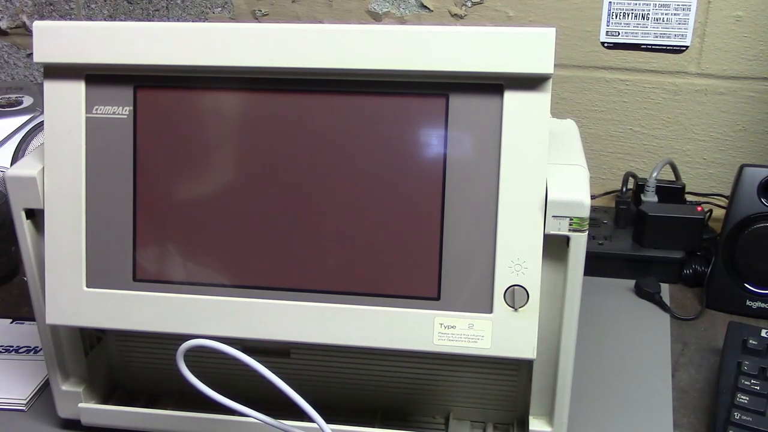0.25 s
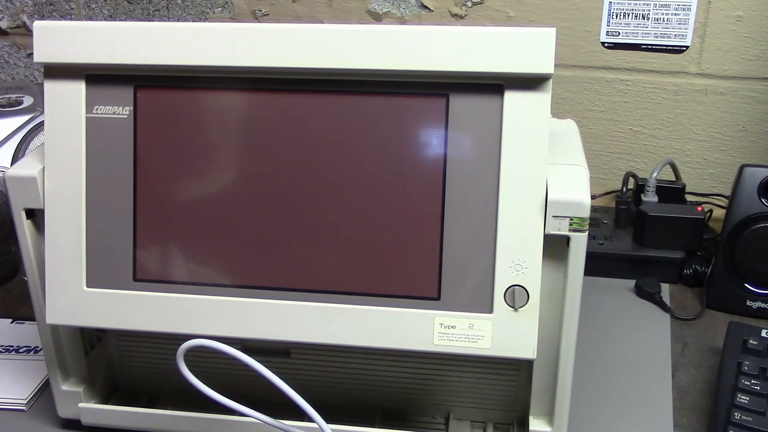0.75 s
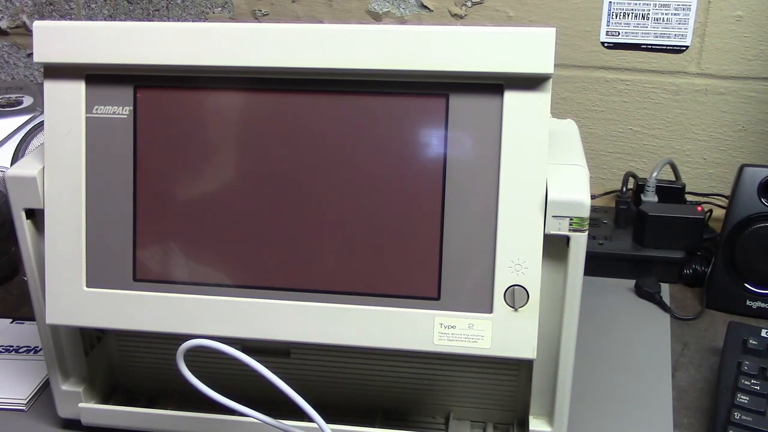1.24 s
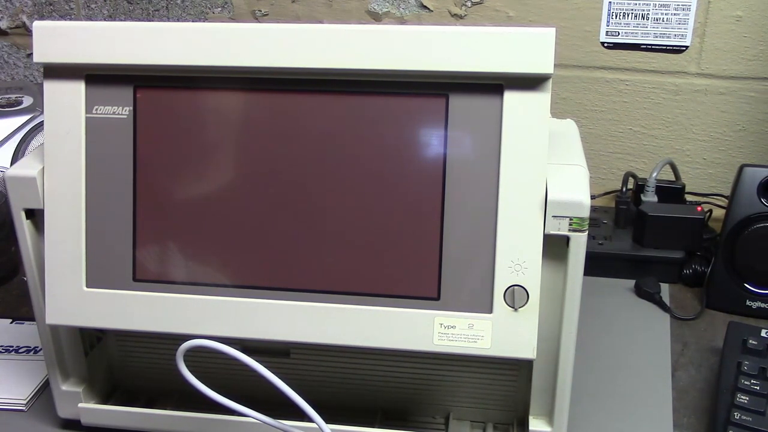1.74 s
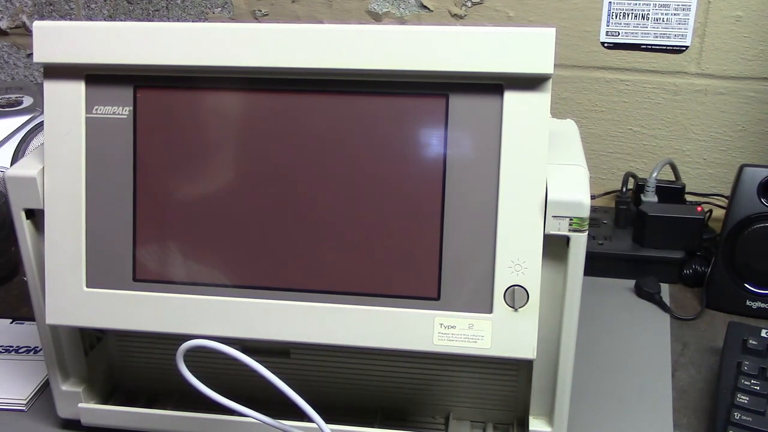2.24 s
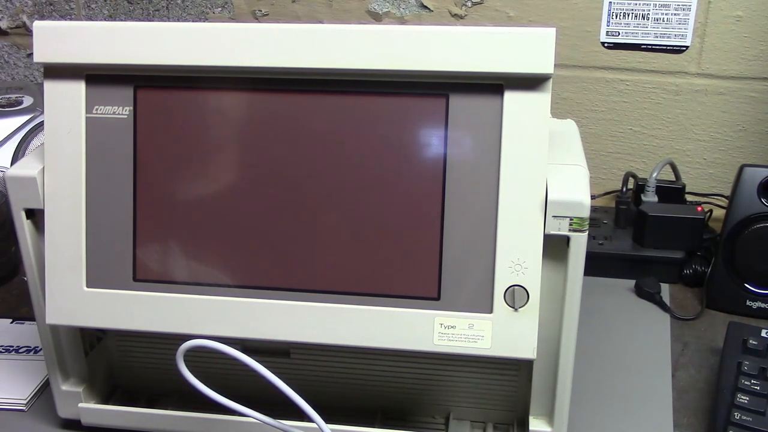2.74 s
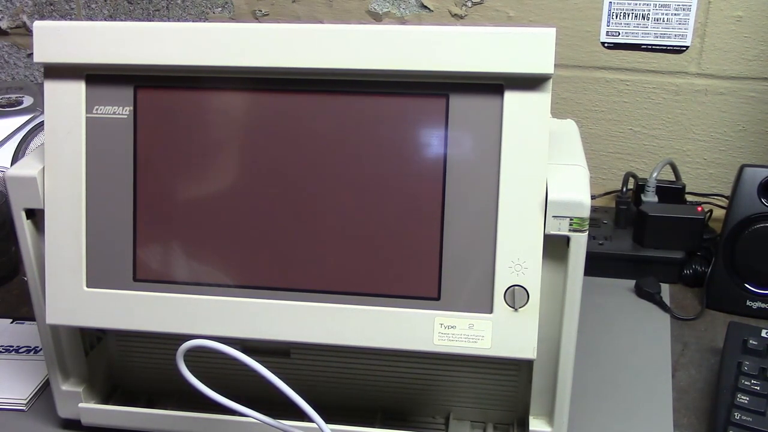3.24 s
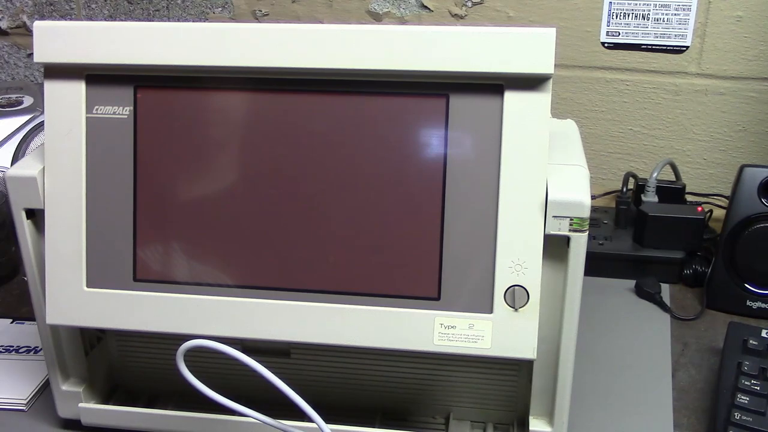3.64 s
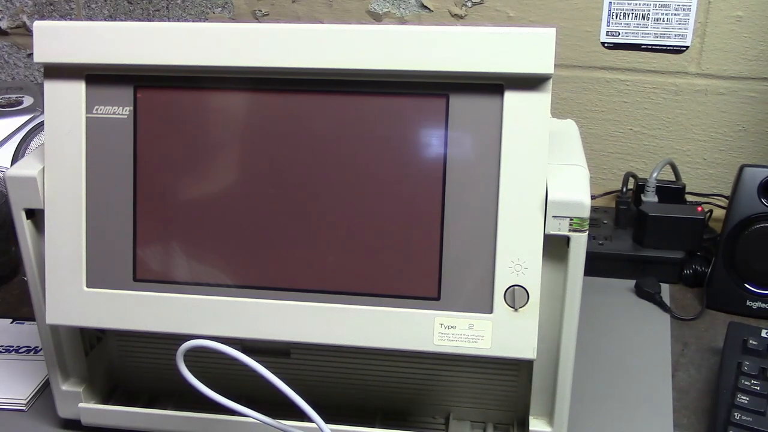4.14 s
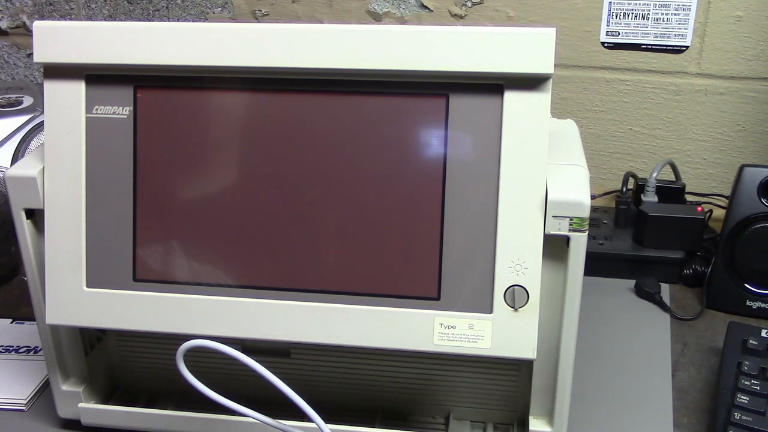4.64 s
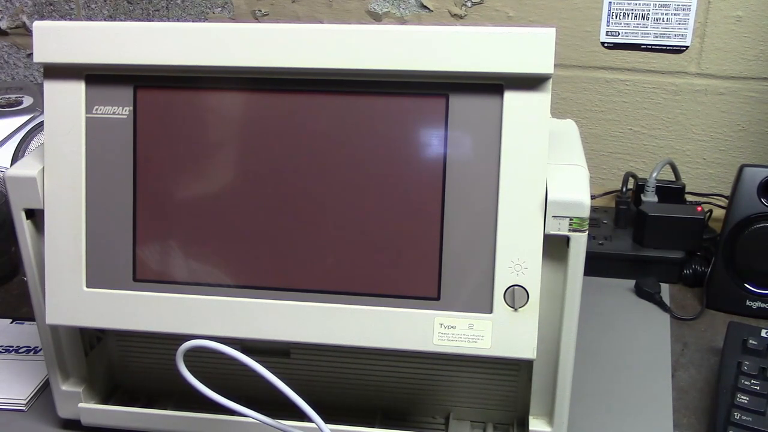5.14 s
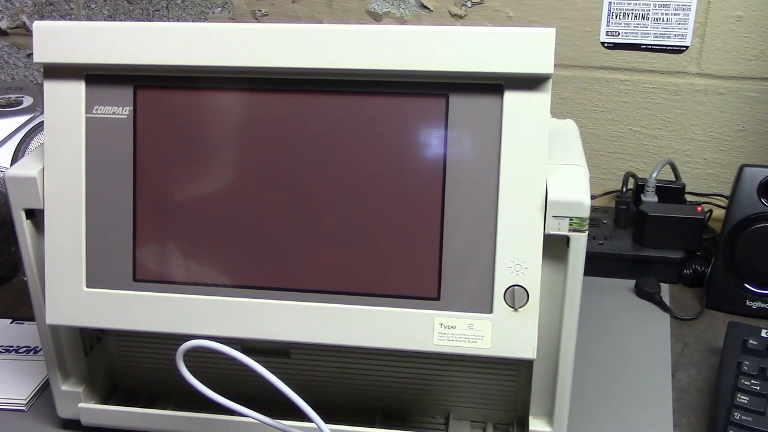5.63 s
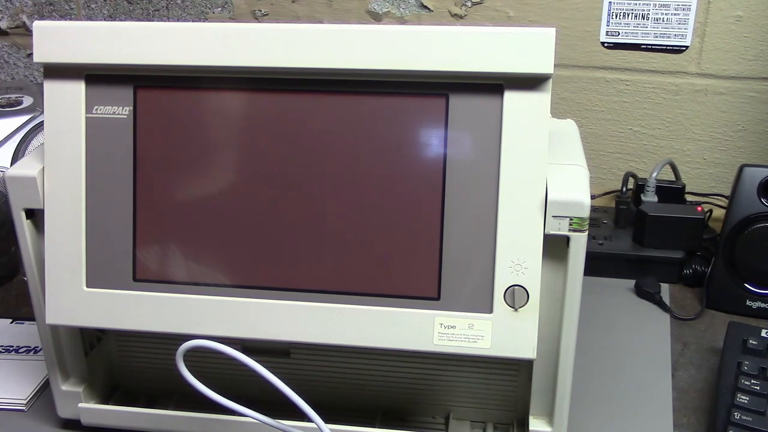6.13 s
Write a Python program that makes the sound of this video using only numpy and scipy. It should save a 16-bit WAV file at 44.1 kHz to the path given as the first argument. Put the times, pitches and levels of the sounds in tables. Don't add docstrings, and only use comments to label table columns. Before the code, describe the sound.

A continuous, bass-heavy machine hum fills the close, nearly mono sound, thick with rumbling fan air that swells and sags slightly. Over it a disk drive seeks in short muffled burrs, singly at first, then in groups, some with crisp little carriage ticks. Three faint metallic pings ring briefly. The level dips gently now and then, and the machine keeps running throughout.

```python
import sys
import numpy as np
from scipy import signal
from scipy.fft import rfft, irfft, next_fast_len
from scipy.io import wavfile
from scipy.ndimage import uniform_filter1d, minimum_filter1d, map_coordinates

SR = 44100
rng = np.random.default_rng(int(sys.argv[2]) if len(sys.argv) > 2 else 0)


def dump(signal):
    limited = np.clip(np.atleast_2d(signal).T, -1, 1)
    pcm = np.round(limited * 32767).astype(np.int16)
    wavfile.write(sys.argv[1], SR, pcm)


def voltage_ratio(level):
    return 10 ** (np.asarray(level, float) / 20)


N = 281358
TIME = np.arange(N) / SR

MAINS_HZ, NEAR_FAN_HZ, FAR_FAN_HZ, SPINDLE_HZ = 60.015, 44.459, 36.092, 59.42
NEAR_FAN_SLOWING = -4.5e-5
# order (multiple of the mains), level_db (rms)
MAINS_TONES = [(2, -24.4)]
# order (multiple of the turning rate), level_db (rms)
NEAR_FAN_TONES = [(5, -45), (7, -37.6), (9, -50), (12, -45.4), (13, -54), (14, -59), (15, -55), (16, -58),
                  (20, -51), (21, -57), (24, -41.3), (28, -52), (32, -53), (35, -65), (36, -57), (40, -56),
                  (42, -68), (44, -66), (48, -68), (51, -74), (54, -71), (56, -76)]
# order (multiple of the turning rate), level_db (rms)
FAR_FAN_TONES = [(6, -42), (12, -40.4), (13, -54), (18, -53.5), (21, -50.6), (22, -53), (23, -56),
                 (24, -42.8), (30, -55), (36, -68)]
# order (multiple of the turning rate), level_db (rms)
SPINDLE_TONES = [(1, -36.7), (84, -79), (104, -79), (106, -80), (107, -83), (110, -83), (157, -84),
                 (158, -86)]


def hum():
    near_turns = NEAR_FAN_HZ * (TIME + NEAR_FAN_SLOWING * (TIME - 2.9) ** 2 / 2)
    transformer = voltage_ratio(-0.4) * rotor(MAINS_HZ * TIME, MAINS_TONES, waver_db=-0.16)
    near_fan = rotor(near_turns, NEAR_FAN_TONES, waver_db=0.64)
    far_fan = rotor(FAR_FAN_HZ * TIME, FAR_FAN_TONES, waver_db=1.6)
    spindle = voltage_ratio(1.0) * rotor(SPINDLE_HZ * TIME, SPINDLE_TONES, waver_db=1.2)
    return transformer + near_fan + far_fan + spindle


AIR_DB = -24.5
SURGE_WIDTH_S, DUCT_FOLLOWS = 0.023, 0.33
# pitch_hz, level_db (per Hz)
AIR_COLOUR = [(8, -40), (14, -14), (60, -9.5), (140, -13.5), (190, -6.5), (300, -13), (600, -19.5),
              (950, -22), (1200, -27.5), (1500, -29), (2400, -39), (6000, -48), (7500, -50.5),
              (15500, -56.5)]
# pitch_hz, width_hz, lift_db
BOOMS = [(29.2, 7.6, 10), (46.2, 7.1, 9), (74.4, 9.3, 13.5), (99.1, 11.2, 14.5), (125.9, 9.8, 12.5),
         (143, 13, -2), (166.3, 11, 5.5), (204, 9.8, 2.5), (246, 17, 2.5), (340, 5.1, 1), (363, 19, 2.5),
         (419, 21, -3.5), (484, 3.8, 7), (561, 55, 4.5), (612, 28, -5), (920, 81, 2), (1053, 10, 2),
         (1186, 60, 0), (1340, 62, 2), (1473, 30, 4), (1620, 100, -1), (1860, 82, 4), (2050, 90, 3),
         (2850, 220, 2), (5660, 620, 2.5)]
# start_s (centre), level_db (change)
SURGES = [
    (.47, 3.5),
    (.61, -5),
    (.99, -4),
    (1.39, 5.5),
    (2.19, 5),
    (3.92, -4.5),
    (4.03, -1.5),
    (4.93, 2),
    (5.55, 1.5),
    (6.31, 0),
]


def air():
    x = voltage_ratio(AIR_DB) * shaped_noise(AIR_COLOUR, BOOMS)
    deep, duct, body = (low_pass(x, hz) for hz in (125, 300, 1800))
    surge_db = sum(db * np.exp(-((TIME - s) / SURGE_WIDTH_S) ** 2 / 2) for s, db in SURGES)
    flutter = voltage_ratio(0.2 * drift(7) + 0.3 * drift(25))
    rumble = voltage_ratio(surge_db) * deep + voltage_ratio(DUCT_FOLLOWS * surge_db) * (duct - deep)
    return rumble + body - duct + flutter * (x - body)


STEPPER_HZ = 388
# start_s, length_s, level_db (rms)
SEEKS = [(.705, 0.024, -31.5), (1.388, .03, -36), (2.535, 0.028, -31), (3.15, 0.035, -25.5),
         (3.435, 0.022, -27), (3.69, 0.014, -27), (4.2, 0.041, -40), (4.7, 0.049, -32.5),
         (5.11, 0.038, -28.5), (5.165, 0.049, -32), (6.16, 0.05, -27.5), (6.257, 0.056, -30.5),
         (6.335, 0.037, -38)]
# order (multiple), level_db
STEPPER_TONES = [(1, 0), (2, -15)]
# pitch_hz, width_hz, level_db
CASE_PANELS = [(470, 110, -7.5), (620, 170, -7.5), (827, 130, -8.5), (1350, 200, -21)]


def stepper():
    steps = STEPPER_HZ * np.cumsum(1 + 0.008 * drift(30)) / SR
    buzz = rotor(steps, STEPPER_TONES, waver_db=0)
    white = rng.standard_normal(N)
    case = np.zeros(N)
    for k, (hz, width_hz, db) in enumerate(CASE_PANELS):
        case += (-1) ** k * voltage_ratio(db) * resonate(white, hz, width_hz)
    return bursts(SEEKS, rise_s=0.014, fade_s=0.012) * (buzz + voltage_ratio(-6) * case / np.std(case))


# start_s, level_db (rms), length_s (scrape)
TICKS = [(.315, -57, .02), (.445, -59, .01), (0.708, -48, .015), (.945, -59, .01), (2.325, -54, .02),
         (2.534, -49, .015), (2.58, -58, .01), (3.11, -65, .03), (3.147, -52, .015), (3.176, -51.5, .015),
         (3.425, -56, .015), (3.456, -57, .006), (3.699, -49, .01), (4.2, -47.5, .012), (4.33, -56, .01),
         (4.49, -55, .01), (4.541, -43.5, 0.023), (4.65, -58, .01), (4.7, -47.5, 0.0089),
         (5.117, -52.5, .012), (5.147, -54, .03), (6.09, -57, .015), (6.135, -55, .02), (6.17, -59, .015),
         (6.21, -51, .008), (6.25, -51, .012), (6.307, -54, .015)]
# pitch_hz, level_db (per Hz)
CARRIAGE_COLOUR = [(900, -22), (2000, -10), (3500, -4), (6500, -8), (9000, -13), (11500, -19), (13500, -24),
                   (16000, -32)]
# pitch_hz, width_hz, lift_db
CARRIAGE_RINGS = [(3770, 360, 3.2), (5020, 400, 7.8), (8500, 600, 3), (10800, 600, 3)]


def carriage():
    rows = [(s, length, db) for s, db, length in TICKS]
    envelope = bursts(rows, rise_s=0.01, fade_s=0.024, sag_db_s=87)
    hardness = envelope / envelope.max()
    edges = shaped_noise([(1200, -18), (2400, 0), (3200, -3), (8000, -14), (12500, -11), (16000, -22)])
    scrape = shaped_noise(CARRIAGE_COLOUR, CARRIAGE_RINGS) * voltage_ratio(1.6 * drift(120))
    return envelope * (scrape + 0.87 * hardness * edges)


PING_HZ, PING_T60_S = 1786, 0.22
# start_s, level_db (peak)
PINGS = [
    (.32, -42),
    (2.335, -37),
    (4.33, -39),
]


def pings():
    out = np.zeros(N)
    for s, db in PINGS:
        after = np.maximum(TIME - s, 0)
        onset = np.minimum(after / 0.0053, 1)
        out += onset * voltage_ratio(db - 60 * after / PING_T60_S) * np.sin(2 * np.pi * PING_HZ * after)
    return out


SIDE_DB = -59.4
# pitch_hz, level_db (per Hz)
SIDE_COLOUR = [(12, -2.5), (130, -2.5), (420, -18), (900, -26), (1800, -29.5), (2400, -24.8),
               (4300, -22.7), (9700, -25.8), (15500, -28.3)]


def side_noise():
    x = voltage_ratio(SIDE_DB) * shaped_noise(SIDE_COLOUR)
    low = low_pass(x, 900)
    lumps = voltage_ratio(-4.0 + 7 * np.tanh(2 * drift(17)))
    flicker = voltage_ratio(-0.8 + 0.5 * drift(25))
    return lumps * low + flicker * (x - low)


def rotor(turns, orders, waver_db):
    out = np.zeros(N)
    for order, db in orders:
        level = np.sqrt(2) * voltage_ratio(db + waver_db * drift(2.92))
        out += level * np.sin(2 * np.pi * (order * turns + rng.random()))
    return out


def bursts(rows, rise_s, fade_s, sag_db_s=0):
    envelope = np.zeros(N)
    for s, length, db in rows:
        after = np.maximum(TIME - s, 0)
        rise = np.sin(np.pi / 2 * np.minimum(after / rise_s, 1)) ** 2
        fade = np.exp(-np.maximum(after - length, 0) / fade_s)
        envelope += voltage_ratio(db - sag_db_s * after) * rise * fade
    return envelope


def drift(rate):
    knots = rng.standard_normal(int(rate * N / SR) + 4)
    coarse = np.append(TIME[::32], TIME[-1])
    return np.interp(TIME, coarse, map_coordinates(knots, [coarse * rate + 1], order=3))


def shaped_noise(points, lifts=()):
    size = next_fast_len(N)
    hz = np.maximum(np.arange(size // 2 + 1) * SR / size, 1)
    point_hz, point_db = np.transpose(points)
    db = np.interp(np.log(hz), np.log(point_hz), point_db)
    for mid_hz, width_hz, lift_db in lifts:
        db = db + lift_db / (1 + (2 * (hz - mid_hz) / width_hz) ** 2)
    x = irfft(rfft(rng.standard_normal(size)) * voltage_ratio(db), size)[:N]
    return x / np.std(x)


def resonate(x, hz, width_hz):
    r = np.exp(-np.pi * width_hz / SR)
    zeros = (1 - r * r) / 2 * np.array([1, 0, -1])
    poles = [1, -2 * r * np.cos(2 * np.pi * hz / SR), r * r]
    return signal.lfilter(zeros, poles, x)


def low_pass(x, hz):
    return signal.sosfiltfilt(signal.butter(2, hz, fs=SR, output="sos"), x)


def scene():
    mid = hum() + air() + stepper() + carriage() + pings()
    side = side_noise() - voltage_ratio(-46.5) * mid
    return np.array([mid + side, mid - side])


DUCK_ATTACK_S, DUCK_RELEASE_S, REST_GAIN_DB = 0.15, 0.45, 0.65
# start_s, depth_db
DUCKS = [
    (0.0, 0.15),
    (2.18, 1.55),
    (3.55, 1.5),
    (4.88, 0.8),
]


def gain_control():
    sunk_db = np.zeros(N)
    for s, depth_db in DUCKS:
        after = np.maximum(TIME - s, 0)
        sink = np.minimum(after / DUCK_ATTACK_S, 1)
        recovery = np.exp(-(np.maximum(after - DUCK_ATTACK_S, 0) / DUCK_RELEASE_S) ** 2)
        sunk_db += depth_db * sink * recovery
    return voltage_ratio(REST_GAIN_DB - sunk_db)


LIMIT, LIMIT_RELEASE_DB_S = 0.317, 60


def limiter(x):
    over_db = np.maximum(20 * np.log10(np.abs(x).max(axis=0) / LIMIT + 1e-9), 0)
    release_db = LIMIT_RELEASE_DB_S * TIME
    held_db = np.maximum.accumulate(over_db + release_db) - release_db
    cut_db = uniform_filter1d(-minimum_filter1d(-held_db, size=45), size=45)
    return x * voltage_ratio(-cut_db)


def roll_off(x):
    return signal.sosfilt(signal.butter(12, 15680, fs=SR, output="sos"), x)


def record(dry):
    x = dry * gain_control()
    x = x * np.minimum(TIME / 0.004, 1)
    return roll_off(limiter(x))


dry = scene()
out = record(dry)
dump(out)
```